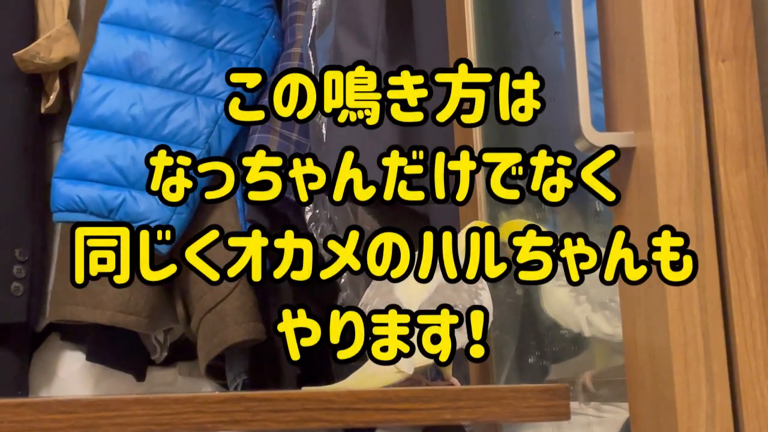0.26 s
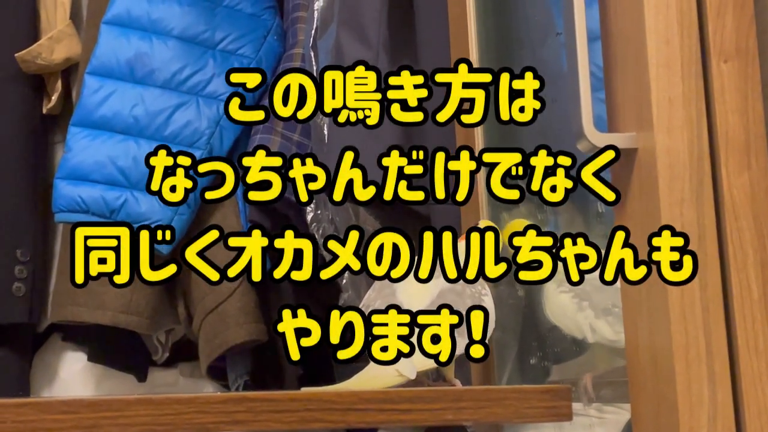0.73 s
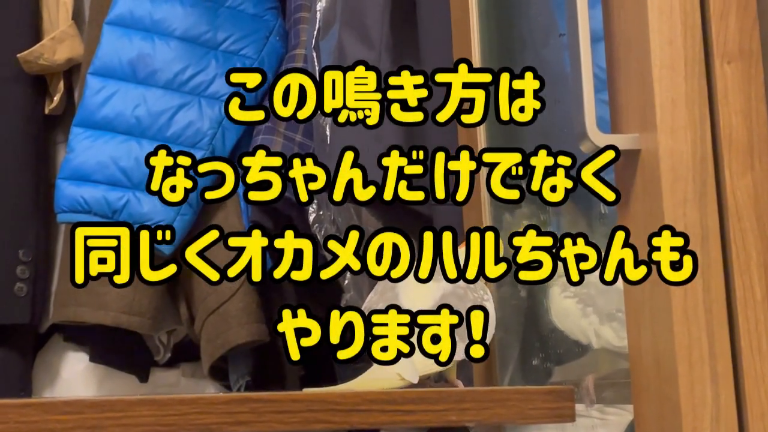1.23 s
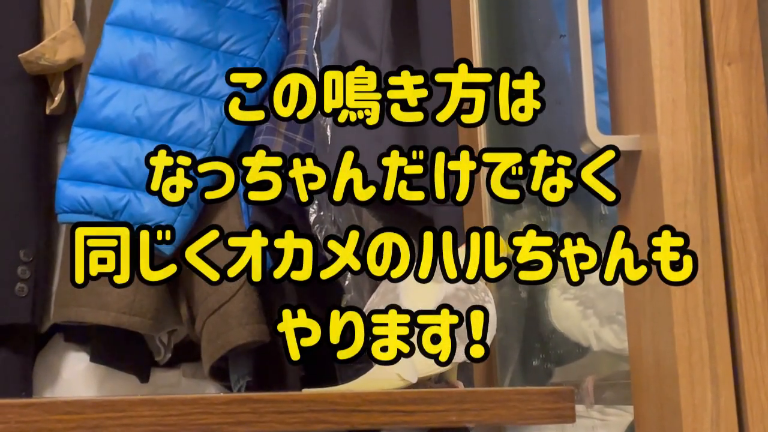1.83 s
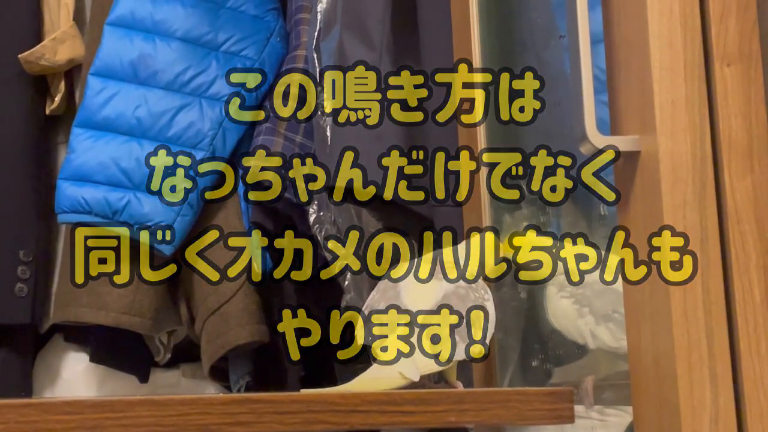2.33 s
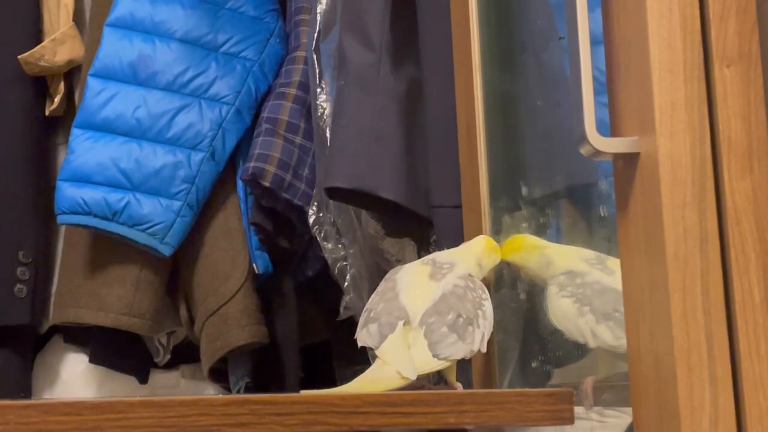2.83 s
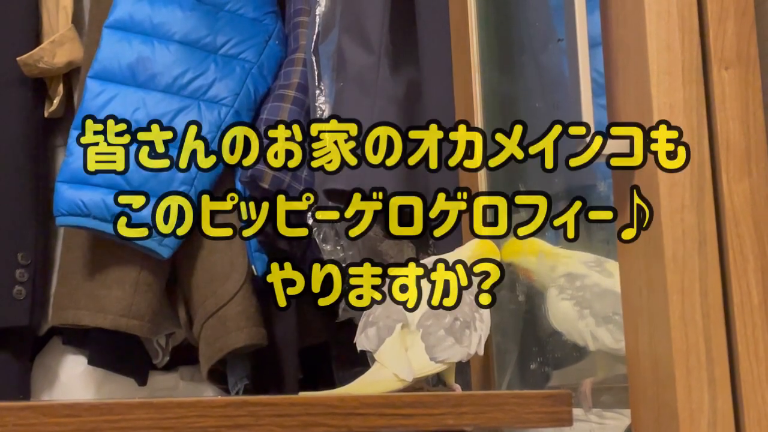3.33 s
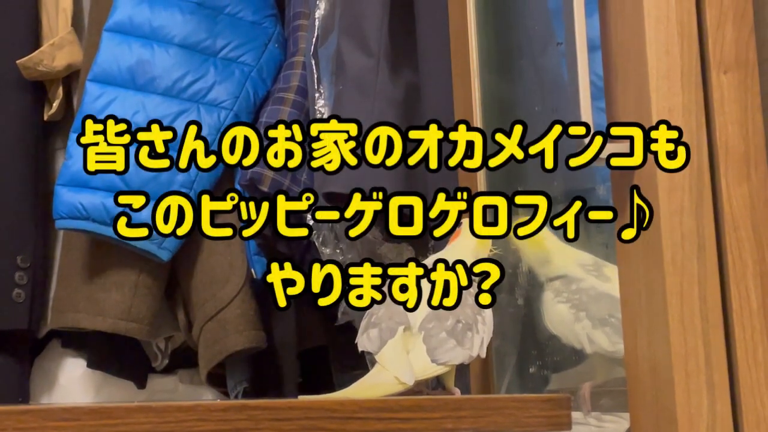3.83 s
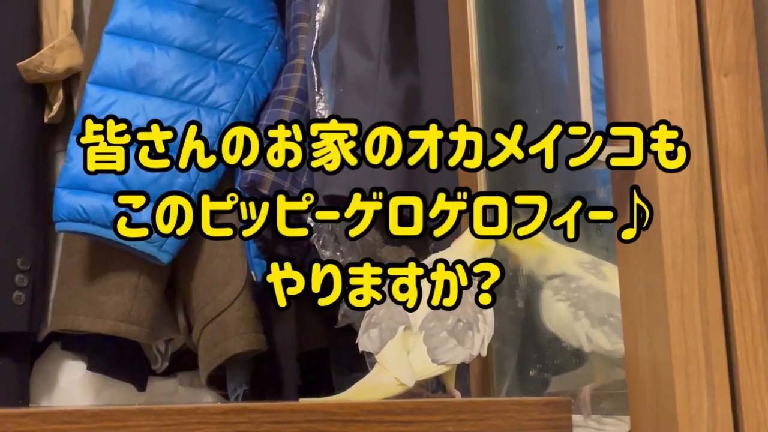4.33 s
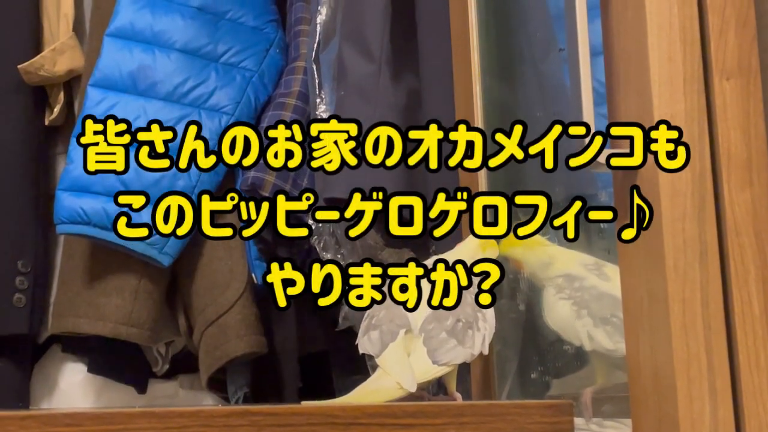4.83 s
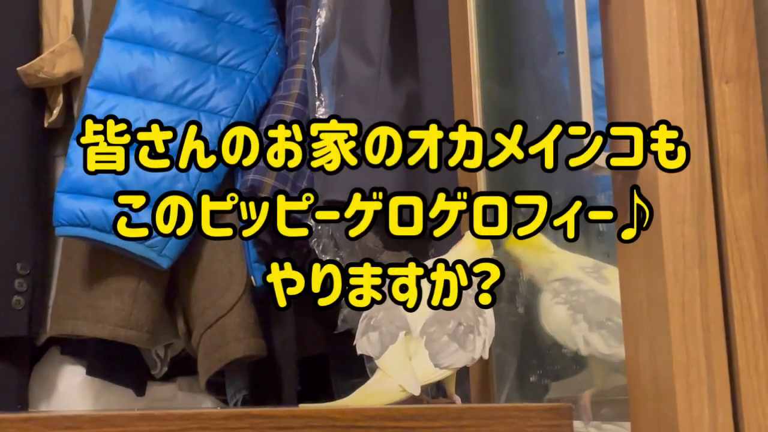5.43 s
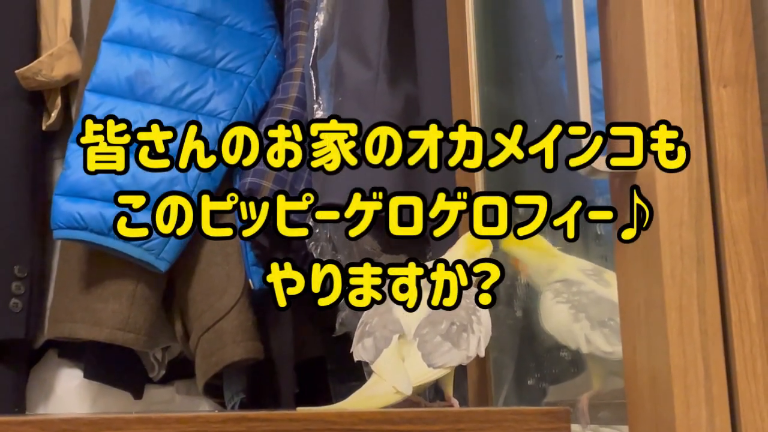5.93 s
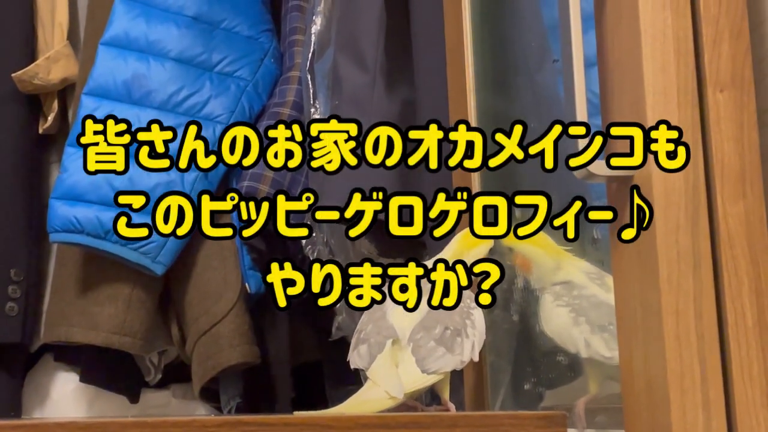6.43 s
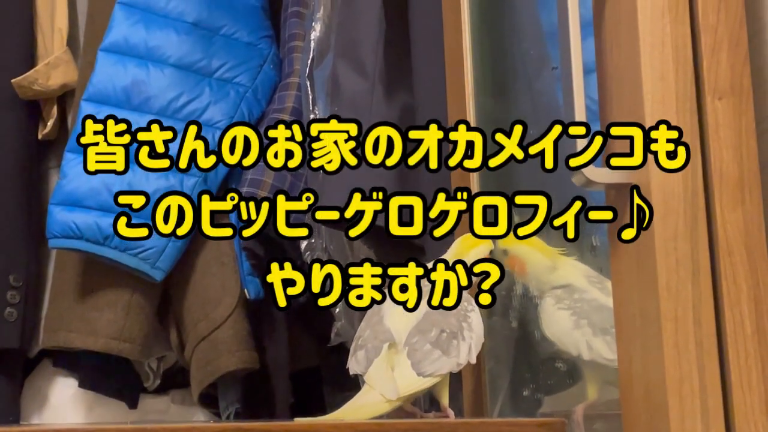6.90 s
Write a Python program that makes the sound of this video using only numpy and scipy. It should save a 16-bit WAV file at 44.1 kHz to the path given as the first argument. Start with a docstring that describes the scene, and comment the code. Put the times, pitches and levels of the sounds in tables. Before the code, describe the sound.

A cockatiel repeats a quick phrase of piping whistles, fast trills and hoarse croaks in a small quiet room over a faint low rumble.

```python
"""Cockatiel in a small room

A cockatiel sings piping whistles, fast trills and hoarse croaks; one soft tap sounds early on.
The voice is a gliding tone with overtones and breath noise; the tap is a short decaying sine.
The room rings briefly after each note (decaying noise) over a low, steady rumble (shaped noise).
A phone's two ports hear it with different levels and phases."""
import sys
import numpy as np
from scipy import signal
from scipy.fft import rfft, irfft, next_fast_len
from scipy.io import wavfile
from scipy.ndimage import map_coordinates

SR = 44100
rng = np.random.default_rng(int(sys.argv[2]) if len(sys.argv) > 2 else 0)


def output_pcm(signal):
    """Save a mono or channel-first signal as 16-bit PCM at the path in sys.argv[1].

    Samples are clipped to [-1, 1] before scaling.
    """
    pcm = np.clip(np.atleast_2d(signal).T, -1, 1) * 32767
    wavfile.write(sys.argv[1], SR, np.round(pcm).astype(np.int16))


N = 315756  # samples

# House rumble spectrum. Each row: frequency in Hz, relative density in dB.
RUMBLE_SPECTRUM = [(12, -36), (22, -22), (59, 2), (88, 0.5), (150, -6), (200, -15.5), (290, -10),
                   (380, -16.5), (476, -12), (700, -20), (1430, -29), (2040, -28.5), (3160, -42.5),
                   (6460, -54), (9000, -66), (19800, -120)]
# Left-right likeness of the rumble. Each row: frequency in Hz, correlation (1 = mono).
RUMBLE_LIKENESS = [(60, 1), (150, 0.88), (400, 0.67), (1300, .3), (3000, 0.53)]
# Early decay of the room. Each row: frequency in Hz, time to fall 60 dB in seconds.
ROOM_T60 = [(800, 0.14), (2500, 0.12), (5000, 0.11), (10000, 0.063)]
# Echoes that differ from side to side. Each row: frequency in Hz, size over the shared echoes as a ratio.
ROOM_WIDTH = [(1200, 1.8), (2500, 0.53), (5000, 0.19)]
# Taps in the room. Each row: start in seconds, level in dB before the mix.
TAPS = [(0.515, -38.5)]

# Throat weighting of the third and higher partials. Each row: frequency in Hz, relative level in dB.
THROAT = [(3600, 24), (5000, 2), (6500, -12.5), (7800, -9.5), (9000, -50)]
# Thin top of the voice. Each row: frequency in Hz, relative level in dB.
SHEEN = [(6000, -33), (8000, -8), (10000, 3.5), (12500, -4.5), (14800, -4.5), (16000, -10.5)]
# Noise of the fluttering membrane. Each row: frequency in Hz, relative level in dB.
RASP_SPECTRUM = [(500, -52), (900, -7), (1600, 4.5), (2600, 2), (4000, -17), (6000, -41), (8000, -38)]
# Air through the open beak. Each row: frequency in Hz, relative level in dB.
BREATH_SPECTRUM = [(800, -23.5), (2000, -18.5), (3700, 5.5), (5200, -4.5), (7500, -16), (9000, -42)]
# Overtones swell where the pitch puts them on the throat's resonances.
# Each row: pitch in Hz, base level in dB over the tone; for the second partial, then for all higher ones.
SECOND_PARTIAL = [(1230, -15), (1500, -7.5), (1650, -15), (1850, -13.5), (2100, -27), (2600, -32.5),
                  (3400, -28.5), (4200, -21.5)]
UPPER_PARTIALS = [(1230, -18), (1500, -24), (1650, -9), (1850, -29), (2100, -41.5), (2600, -43.5),
                  (3400, -24.5), (4200, -23)]

# Syllable shapes. Each row: share of the length, pitch in Hz (only its ratio to the first row counts),
# relative level in dB, relative brightness in dB, trill width as share of pitch, rasp from 0 to 1.
DIP = [(0, 2214, -7.5, 2.5, 0.023, 0.02), (.18, 2090, .5, -1.5, .03, 0.01),
       (.32, 1826, -0.5, -12.5, .36, .14), (.58, 1840, -3, -7, 0.37, .18), (.72, 2167, 0, -5, 0.0089, 0),
       (1, 2125, -3, -3.5, .04, 0.03)]
PIP = [(0, 1891, -7, 4, .01, 0.026), (.4, 2437, -2, 4, .01, .01), (.72, 2316, 1, -1, .03, 0.041),
       (1, 1638, -17.5, -16, .06, 0.074)]
HOLD = [(0, 1230, 0.5, -4.5, .01, 0.075), (.35, 1231, -0.5, -1.5, 0.016, 0.18),
        (.75, 1264, -0.5, 3, 0.021, 0.023), (1, 1306, 1.5, -5, .01, .07)]
RISE = [(0, 1277, -8.5, -6, .01, .04), (.35, 1583, -3.5, -19, 0.0087, 0.13), (.75, 2150, 1, 0, .01, 0.022),
        (1, 2417, -0.5, -0.5, 0.014, .01)]
LEAP = [(0, 1420, -1, -16.5, 0.18, 0.14), (.38, 2105, 7.5, -13.5, .3, 0.19),
        (.57, 3396, -5.5, 3.5, 0.084, .07), (.78, 3450, -0.5, 1.5, .05, 0.037),
        (1, 3257, -4, -3.5, 0.0087, 0.13)]
RASPING = [(0, 2140, 2.5, -10.5, .44, 0.2), (.23, 1950, 2, -18, 0.5, .24), (.44, 1700, -6, -26, 0.35, 0.25),
           (.62, 1336, -13.5, -9, .15, .18), (.83, 1720, -7.5, -35.5, 0.24, .26),
           (1, 1533, -2.5, -10, 0.094, 0.39)]
CHEEP = [(0, 1450, 9.5, -31.5, .12, 0.64), (.36, 3200, -2, -14, 0.1, .45),
         (.62, 4130, -16.5, -18, 0.021, 0.07), (1, 4210, -2, -10, .05, .07)]
SLIDE = [(0, 1690, -1.1, -1, .01, .06), (.5, 1770, .5, 0.5, .03, .01), (1, 2030, -1, -2.5, 0.087, 0.023)]
TOP = [(0, 2440, -3.5, 1.5, .1, 0.068), (.35, 2697, 3, -6.5, .02, 0.0075), (.7, 2700, -1, 0, .04, 0.022),
       (1, 2745, -7.5, -8.5, .02, .005)]
FLUTE = [(0, 1580, -3, -5.5, .005, .05), (.3, 1640, 0, -8, .005, 0.062), (.7, 1651, -0.5, 3.5, .005, 0.012),
         (1, 1655, -4.5, 4, .005, 0.036)]
BREAK = [(0, 1330, -3, -14, .16, 0.092), (.45, 1796, -2.5, -17.5, .22, .18), (.77, 2085, 4, 2.5, .01, .01),
         (1, 2040, -8, 1.5, .01, 0.043)]
SWOOP = [(0, 3988, 0.62, -3.5, .01, .25), (1, 2908, 1.5, -8.5, .01, .25)]
CROAK = [(0, 1910, -7, 22, .01, .12), (.25, 1811, -2, 11, 0.053, 0.2), (.55, 1750, -2, 5, 0.088, .42),
         (1, 1670, -13.5, 9, .18, .48)]
BUZZ = [(0, 1433, -6.5, -19.5, .15, .35), (.35, 1606, 2, -11.5, .14, .33),
        (.66, 1530, -6, 10, 0.027, 0.077), (1, 1507, -4, 5, .02, 0.071)]
CLIMB = [(0, 1741, -7.5, -13.5, .18, .01), (.47, 2205, 1.5, -6, .18, 0.013),
         (.82, 2420, 3.5, -2, 0.17, .02), (1, 3001, -5.5, 2.5, .1, 0.038)]

# Occasions of each syllable. Each row: start in seconds, length in seconds, starting pitch in Hz,
# glide exponent (1 = as in the shape), level in dB before rasp and mix, swell from start to end in dB,
# added brightness in dB.
DIPS = [(.046, .109, 2258, 1.1, -18.5, 1.6, -7), (3.523, .092, 2162, 0.97, -18.5, -5.5, -3.5),
        (6.666, .113, 2167, 0.94, -18.5, 0.3, -5)]
PIPS = [(.415, .038, 1904, .9, -12, -2, 0.73), (3.861, .036, 1824, 1.1, -11, -0.2, .1),
        (6.344, .037, 1817, .95, -13.5, -0.82, .1)]
HOLDS = [(.665, .1, 1228, 0.98, -33, 3, -5), (2.789, 0.023, 1230, .3, -31.5, .1, -2),
         (4.126, .099, 1224, 1.1, -32, 4, 4), (5.94, .062, 1232, 1.2, -28, 3, -7.5),
         (6.958, .098, 1216, 1.1, -33, 6, -1.9)]
RISES = [(2.82, .048, 1256, 1.07, -17, 7.7, 0.091)]
LEAPS = [(.812, 0.064, 1498, .92, -28.5, -2, .1), (4.254, .066, 1369, 1.04, -30, 3.7, 0.67),
         (7.101, 0.061, 1371, 1.03, -28.5, -1, 0.033)]
RASPINGS = [(.888, .177, 2114, 1.02, -21, -2, .1), (4.33, .185, 2116, 1.02, -20, 1.7, .1)]
CHEEPS = [(1.983, .047, 1450, 1.01, -34.5, 0.066, .1)]
SLIDES = [(1.153, .036, 1706, 1.05, -18, -0.59, 0.45), (4.603, .054, 1682, 1.3, -16.5, 1.6, -2.2)]
TOPS = [(1.203, .092, 2400, 1.15, -18.5, -9.5, 2.3), (4.668, .075, 2475, .9, -14, 5.5, -1.8)]
FLUTES = [(1.083, 0.059, 1560, 1.05, -27, -15.5, 4.5), (2.612, 0.068, 1565, 0.89, -23.5, 3.5, -9.5),
          (4.535, 0.057, 1602, .9, -24, -3.5, 0.5)]
BREAKS = [(6.01, .055, 1319, 1.01, -21.5, .1, .1)]
SWOOPS = [(3.171, .008, 4062, .9, -23, .1, .1), (5.066, .007, 3493, .9, -25.5, 0.27, .1)]
CROAKS = [(1.603, 0.047, 1775, .6, -16.5, -1.5, -2.6), (3.184, 0.071, 1897, 1.1, -16.5, -1.9, 2.1),
          (5.078, .062, 1888, .9, -15.5, -1.3, 3.5)]
BUZZES = [(2.221, .094, 1418, 1.02, -22, .1, 0.2), (5.383, .098, 1464, .95, -20, 0.98, 0.13)]
CLIMBS = [(2.343, .052, 1704, .42, -20, -6.5, 0.13), (5.51, .107, 1732, 1.03, -12.5, 0.7, .1)]

# The whole song. Each row: shape, occasions, mean trill rate in Hz, thin-top offset in dB,
# extra second partial in dB.
SONG = [(DIP, DIPS, 76, 4, .1), (PIP, PIPS, 75, 3, .1), (HOLD, HOLDS, 80, 2.5, 0.69),
        (RISE, RISES, 85, 11, .1), (LEAP, LEAPS, 71, 2, -2), (CHEEP, CHEEPS, 90, .1, .1),
        (RASPING, RASPINGS, 64, 3, .1), (SLIDE, SLIDES, 75, -4.5, 5.8), (TOP, TOPS, 75, -5.5, .1),
        (FLUTE, FLUTES, 80, 1.8, 3), (BREAK, BREAKS, 63, 3.3, .1), (SWOOP, SWOOPS, 80, .1, .1),
        (CROAK, CROAKS, 85, -1, -0.98), (BUZZ, BUZZES, 100, -7, 3), (CLIMB, CLIMBS, 100, -1.6, .1)]

# Level of the left port over the right. Each row: frequency in Hz, difference in dB.
LEFT_OVER_RIGHT = [(100, .4), (200, 1.5), (400, 5), (700, 3.5), (1200, .3), (2200, 1.3), (4000, 0)]
# Phase lead of the left port. Each row: frequency in Hz, lead in radians.
LEFT_LEAD = [(200, 0), (430, .7), (900, 0), (2000, 0), (3500, .3), (5800, 0), (6900, -.9), (8250, -3.14),
             (11000, -6.2), (12600, -6.6), (14600, -9.42)]

RUMBLE_DB = -51
LATE_DB, LATE_LONGER = -24.5, 2.6  # the rest of the house: fainter, rings this many times longer
ATTACK_S, RELEASE_S = .006, .014
SLUR_S = .036  # syllables closer than this join in one breath
BAND_LIMIT_HZ = 15800


def amp(db):
    """Decibels to amplitude ratio."""
    return 10 ** (np.asarray(db) / 20)


def unit(x):
    """Scale to rms 1."""
    return x / np.sqrt(np.mean(x ** 2) + 1e-20)


def along(points, hz):
    """Interpolate (Hz, value) points on a log frequency axis."""
    f, v = np.transpose(points)
    return np.interp(np.log(hz + 1), np.log(f + 1), v)


def wobble(rate_hz):
    """Smooth random curve of rms 1, rate_hz knots a second."""
    knots = rng.standard_normal(int(N * rate_hz / SR) + 4)
    return unit(map_coordinates(knots, [np.arange(N) * rate_hz / SR]))


def filtered(x, response):
    """x through a complex response of frequency."""
    m = next_fast_len(N + SR // 2)
    return irfft(rfft(x, m) * response(np.fft.rfftfreq(m, 1 / SR)), m)[..., :N]


def noise(spectrum):
    """Noise of rms 1 with a given spectrum."""
    return unit(filtered(rng.standard_normal(N), lambda hz: amp(along(spectrum, hz))))


def rumble():
    """Steady house background: shaped noise, near mono in the bass, its level drifting slightly."""
    def mid_side(hz):
        # independent mid and side in these shares give the wanted left-right correlation
        angle = np.arccos(np.clip(along(RUMBLE_LIKENESS, hz), -1, 1)) / 2
        return amp(along(RUMBLE_SPECTRUM, hz)) * [np.cos(angle), np.sin(angle)]

    mid, side = filtered(rng.standard_normal((2, N)), mid_side)
    return amp(RUMBLE_DB + 0.33 * wobble(4.3)) * unit(np.array([mid + side, mid - side]))


def room(x):
    """Walls and glass answer: noise echoes die at a speed set by frequency, partly alike on both sides."""
    hz, t, z = signal.stft(rng.standard_normal((2, SR // 2)), SR, nperseg=256)
    z[1] *= along(ROOM_WIDTH, hz)[:, None]
    fall_db = -60 * t / along(ROOM_T60, hz)[:, None]
    decay = amp(fall_db) + amp(LATE_DB + fall_db / LATE_LONGER)
    both, apart = signal.istft(z * decay, SR, nperseg=256)[1]
    tail = np.array([both + apart, both - apart]) / np.linalg.norm(both)
    delayed = np.pad(x, (130, 0))  # samples before the first echo
    return signal.fftconvolve(delayed[None], tail, axes=1)[:, :N]


def tap():
    """Short dull knock: a 520 Hz sine falling 60 dB in 13 ms."""
    out, t = np.zeros(N), np.arange(SR // 10) / SR
    for start_s, db in TAPS:
        out[round(start_s * SR):][:len(t)] += amp(db - 60 * t / 0.013) * np.sin(2 * np.pi * 520 * t)
    return out


def syllables():
    """Each occasion stretches, transposes and colours its shape; close neighbours join into one note."""
    sung = []
    for shape, occasions, *traits in SONG:
        share, shape_hz, db, bright_db, trill, rasp = np.transpose(shape)
        for start_s, length_s, hz, glide, level_db, swell_db, colour_db in occasions:
            sung.append(np.transpose([
                start_s + length_s * share,
                hz * (shape_hz / shape_hz[0]) ** glide,
                level_db + db + swell_db * (share - .5),
                bright_db + colour_db, trill, rasp,
                *np.outer(traits, np.ones_like(share))]))
    sung.sort(key=lambda n: n[0][0])
    rows, ends = np.concatenate(sung), np.cumsum([len(n) for n in sung])[:-1]
    return np.split(rows, [k for k in ends if rows[k, 0] - rows[k - 1, 0] > SLUR_S])


def breath_gate(notes, t):
    """Notes start within a few ms and are let go a little more slowly."""
    gate = 0
    for n in notes:
        attack = (t - n[0][0]) / ATTACK_S + .5
        release = (n[-1][0] - t) / RELEASE_S + 1
        gate = gate + np.clip(np.minimum(attack, release), 0, 1) ** 2
    return np.minimum(1, gate)


def cockatiel():
    """Membrane tone with overtones; a slower oscillation trills it, unsteady vibration makes it rasp."""
    t = np.arange(N) / SR
    notes = syllables()
    time_s, *columns = np.transpose(np.concatenate(notes))
    time_s = np.maximum.accumulate(time_s)
    hz, tone_db, bright_db, trill, rasp, trill_hz, thin_db, extra_db = (
        np.interp(t, time_s, c) for c in columns)
    trill, rasp = np.abs(trill), np.clip(rasp, 0, 1)
    gate = breath_gate(notes, t)

    # the overtones flutter on their own
    second_db = along(SECOND_PARTIAL, hz) + .9 * bright_db + extra_db + 3.7 * wobble(70)
    upper_db = along(UPPER_PARTIALS, hz) + bright_db + 2.3 * wobble(70)

    # a hoarse trill snaps between a high and a low pitch instead of gliding
    swing = 2 * np.pi * np.cumsum(trill_hz * (1 + (.05 + .25 * rasp) * wobble(60))) / SR
    snap = 1 + 16 * rasp
    bend = .5 * trill * np.tanh(snap * np.sin(swing)) / np.tanh(snap)
    hz = hz * (1 + bend + .003 * wobble(120) + 0.12 * rasp * wobble(500))
    phase = 2 * np.pi * np.cumsum(hz) / SR

    # strongest at the top of each swing, faltering at each snap; rasp weakens it and makes it stumble
    throb_db = (1.5 + 30 * rasp) * trill * np.sin(swing) - 24 * trill * rasp * np.cos(2 * swing)
    throb_db += 1.7 * wobble(100) + 13.18 * rasp * (wobble(300) - 3.0)

    on = gate > 0
    k = np.arange(3, 12)[:, None]  # partial numbers
    partial_hz = k * hz[on]
    upper = amp(along(THROAT, partial_hz))
    upper = amp(upper_db[on]) * upper / np.sqrt(np.sum(upper ** 2, axis=0))
    # the thin top follows the upper partials only in part
    sheen = amp(0.21 * upper_db - 41 + thin_db)
    upper = (upper + sheen[on] * amp(along(SHEEN, partial_hz))) * (partial_hz < BAND_LIMIT_HZ)

    voice = np.sin(phase) + amp(second_db) * np.sin(2 * phase)
    # a rasping membrane skips every other beat: tones at 0.5 and 1.5 times the pitch come and go
    voice += rasp * wobble(150) * (0.25 * np.sin(phase / 2) + .5 * np.sin(3 * phase / 2))
    voice[on] += np.sum(upper * np.sin(k * phase[on]), axis=0)

    # air hisses past the membrane in uneven puffs
    breath = noise(BREATH_SPECTRUM) * (amp(-51.5) + 0.61 * rasp * (amp(second_db) + amp(upper_db)))
    thin_air = noise(SHEEN) * sheen * (0.8 + 1.6 * rasp)
    hiss = (breath + thin_air + 0.49 * rasp * noise(RASP_SPECTRUM)) * amp(0.43 * wobble(240))

    call = gate * amp(tone_db) * (np.sqrt(2) * amp(throb_db) * voice + hiss)
    # so small a body radiates no bass: third-order high-pass, 500 Hz
    return filtered(call, lambda f: (1j * f / (500 + 1j * f)) ** 3)


def scene():
    """Bird and tap, direct and through the room, over the rumble."""
    near = cockatiel() + tap()
    return rumble() + amp(-4) * room(near) + amp(2.5) * near


def record(dry):
    """Two ports differ in level and phase; gain control ducks after loud notes; the band is limited."""
    side = np.array([[.5], [-.5]])  # half of each difference per port

    def ports(hz):
        return amp(side * along(LEFT_OVER_RIGHT, hz)) * np.exp(1j * side * along(LEFT_LEAD, hz))

    x = filtered(dry, ports)
    step = 1 / (.12 * SR)  # 0.12 s smoothing
    loud = np.sqrt(np.abs(signal.lfilter([step], [1, step - 1], np.mean(x ** 2, axis=0))))
    x = x / (1 + loud / 0.27)
    return filtered(x, lambda hz: hz < BAND_LIMIT_HZ)


dry = scene()
out = record(dry)
output_pcm(out)
```